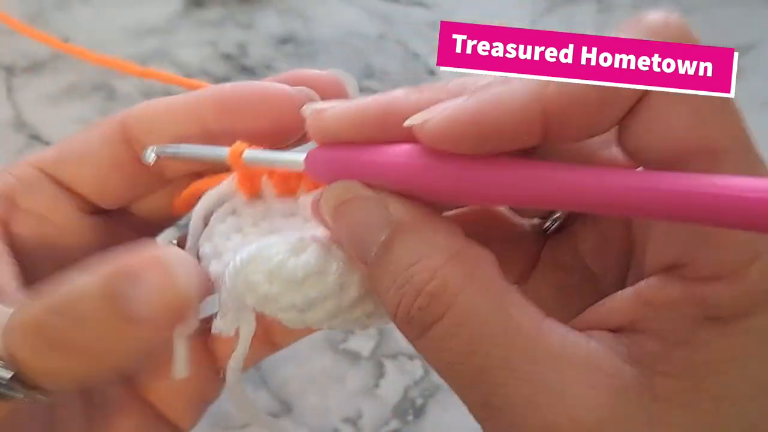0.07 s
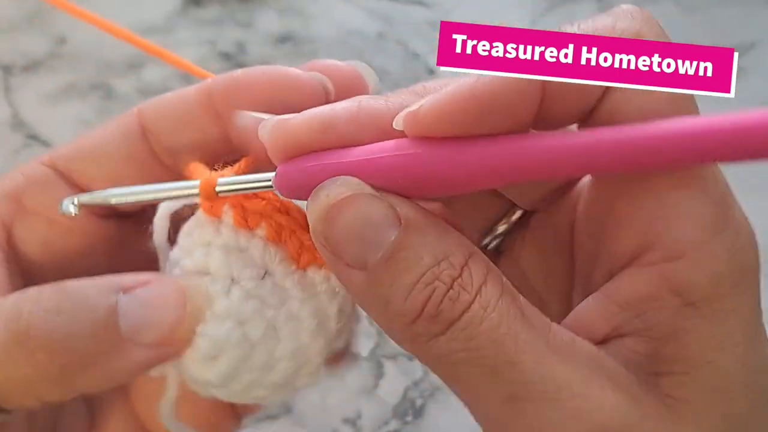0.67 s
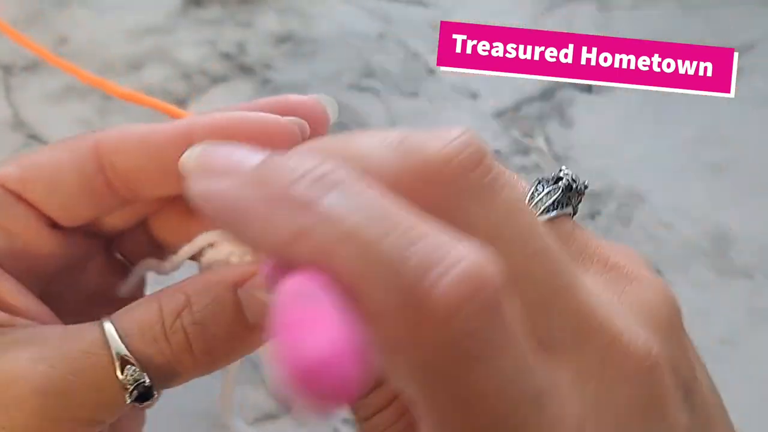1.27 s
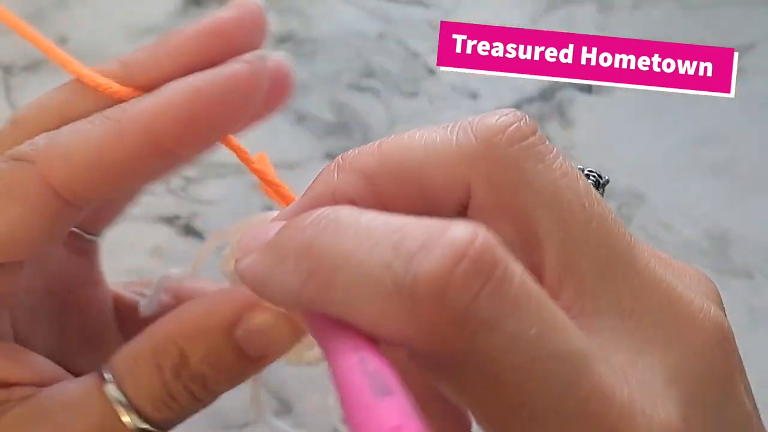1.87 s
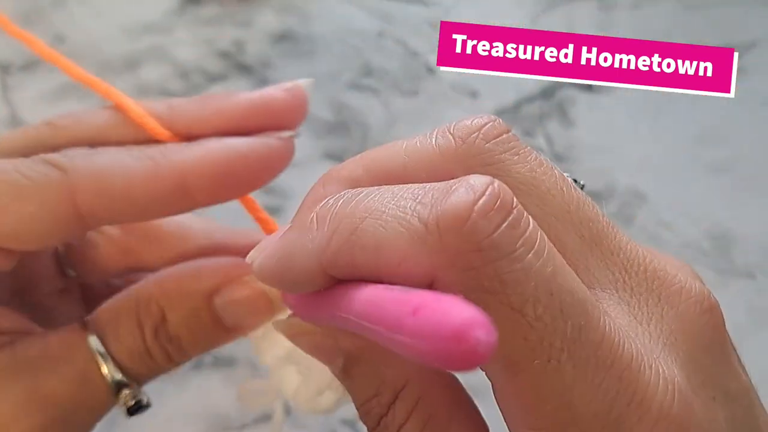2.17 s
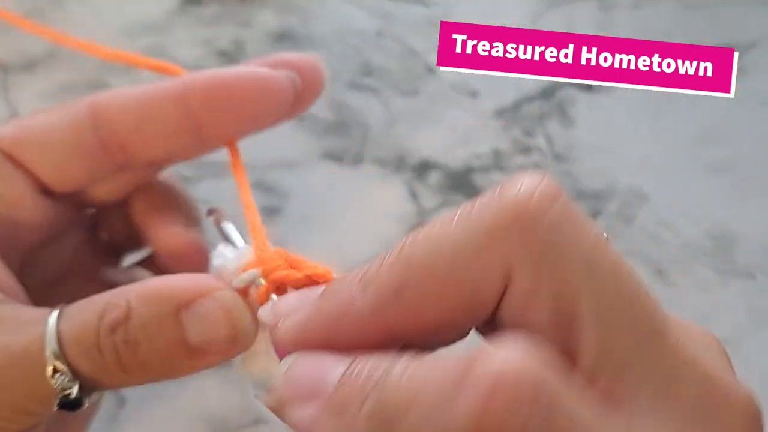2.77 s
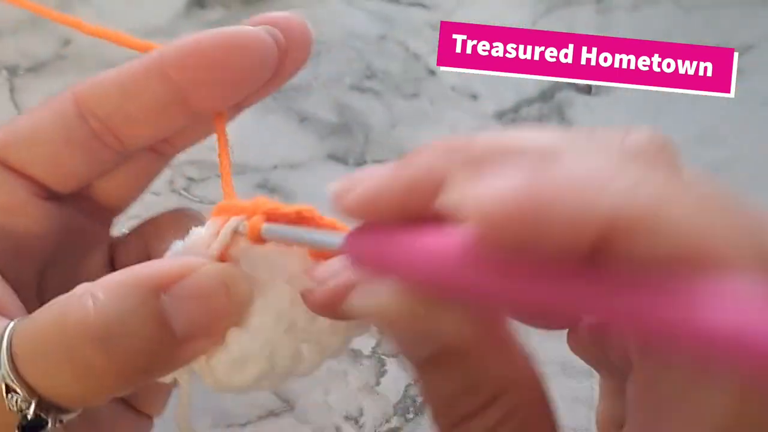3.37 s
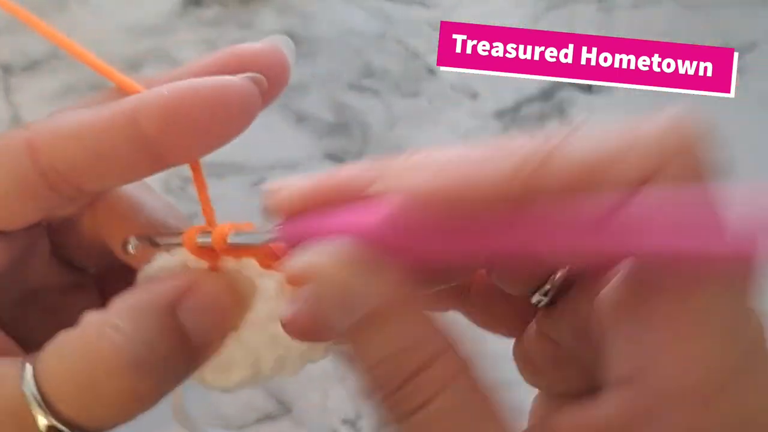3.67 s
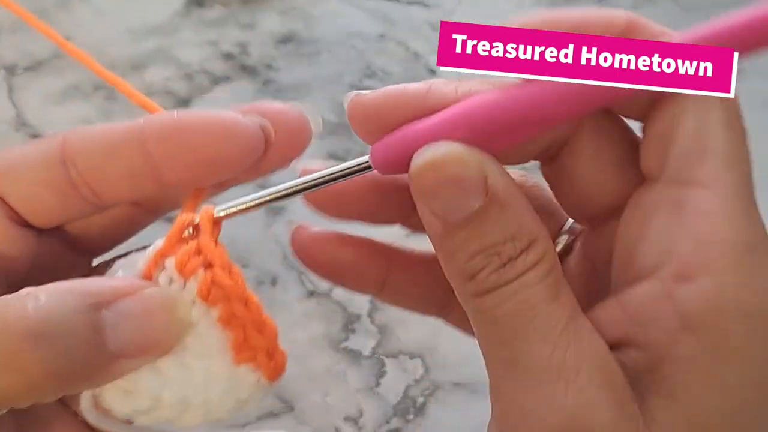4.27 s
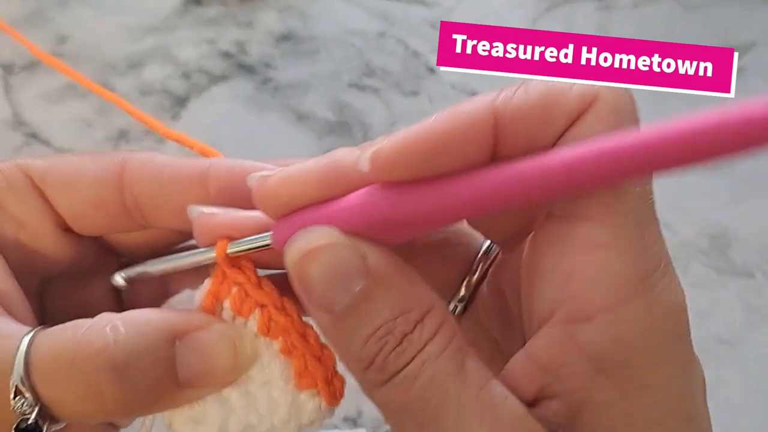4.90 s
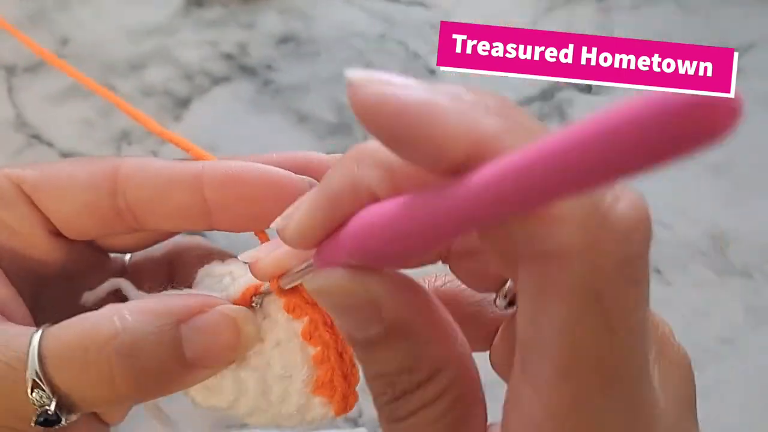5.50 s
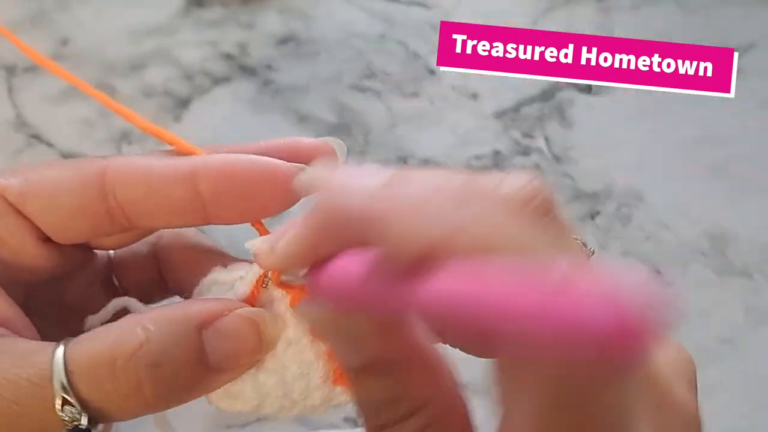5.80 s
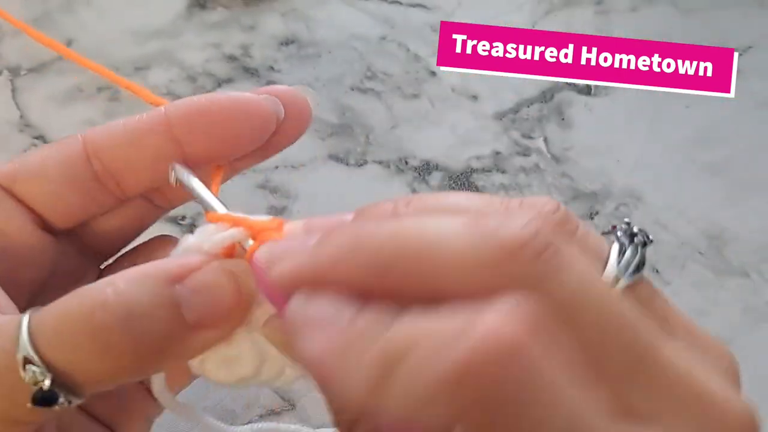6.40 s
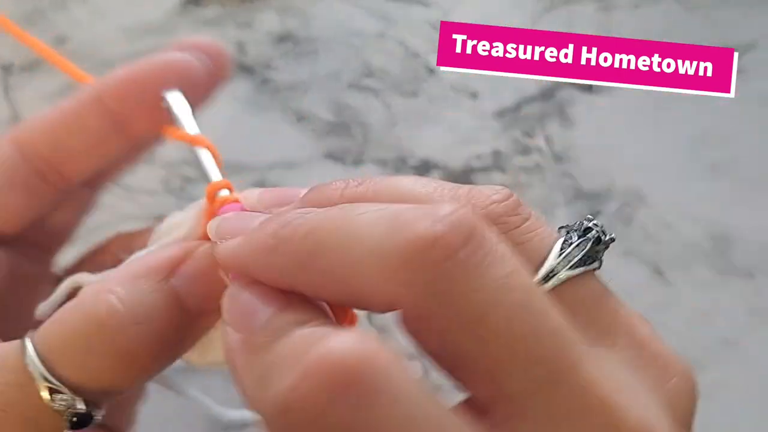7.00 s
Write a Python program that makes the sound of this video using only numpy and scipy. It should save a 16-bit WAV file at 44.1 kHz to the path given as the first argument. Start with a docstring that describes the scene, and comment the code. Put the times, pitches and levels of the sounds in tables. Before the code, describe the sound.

Yarn is crocheted with a metal hook close to the microphone in a quiet room. Soft, uneven rustles swell with each pull, mixed with faint squeaks of skin on the handle. A small click and bump come near the start. About halfway, one sharper knock rings briefly with a slight metallic rattle, followed by dull finger thuds. The rustling then continues, over a steady low appliance hum and light hiss.

```python
"""Yarn is crocheted with a metal hook over a table, close by in a quiet room. Sliding friction makes the sound:
fibres catch and release in a fizz, and skin sticks and slips. Nails and hook tick, the hands bump the work and
lean on the table, and one hard knock, the loose metal falling back just after it, and one later faint knock
excite the modes of a camera stand. An appliance hums steadily behind it all."""
import sys
import numpy as np
from scipy import signal
from scipy.fft import rfft, irfft
from scipy.io import wavfile

SR = 44100
rng = np.random.default_rng(int(sys.argv[2]) if len(sys.argv) > 2 else 0)


def int16_out(signal):
    """Quantize to a 16-bit WAV file."""
    q = np.round(np.clip(np.atleast_2d(signal).T, -1, 1) * 32767)
    wavfile.write(sys.argv[1], SR, q.astype(np.int16))


N = 319725
T = np.arange(N) / SR
HZ = np.fft.rfftfreq(N, 1 / SR)


def amp(db):
    """Amplitude ratio of a level in decibels."""
    return 10 ** (np.asarray(db) / 20)


def unit(x):
    """Normalisation to rms 1."""
    return x / np.sqrt(np.mean(x ** 2) + 1e-30)


def curve(points, hz, column=1):
    """Interpolation of a table column on a log-frequency axis."""
    table = np.array(points, float)
    return np.interp(np.log(hz + 1), np.log(table[:, 0] + 1), table[:, column])


def pan(balance_db):
    """Level difference, left over right, as two gains of mean power 1."""
    half_db = np.atleast_1d(balance_db) / 2
    gains = amp([half_db, -half_db])
    return gains / np.sqrt(np.mean(gains ** 2, 0))


def colour(x, gain):
    """Spectral shaping by a gain at each frequency, scaled to rms 1."""
    return unit(irfft(rfft(x) * gain, N))


def drift(rate_hz):
    """Random modulation: low-pass noise of rms 1."""
    return colour(rng.standard_normal(N), np.exp(-(HZ / rate_hz) ** 2) * (HZ > 0))


def ring(x, spectrum, tilt_db=0, peak_hz=1000, peak_db=0, peak_octaves=0.23):
    """Minimum-phase filtering with a tilt and one resonance: the ringing follows its cause."""
    hz = abs(np.fft.fftfreq(1024, 1 / SR))
    peak = peak_db * np.exp(-(np.log2((hz + 1) / peak_hz) / peak_octaves) ** 2)
    tilt = tilt_db * np.log2((hz + 300) / 5000)
    log_gain = np.log(amp(curve(spectrum, hz) + peak + tilt))
    taps = np.fft.ifft(np.exp(np.conj(signal.hilbert(log_gain)))).real
    return signal.fftconvolve(x, taps[None] / np.linalg.norm(taps), axes=1)


def add(mix, start, sound):
    """Superposition of a sound on the mix, from a start in seconds."""
    part = mix[:, max(round(start * SR), 0):][:, :sound.shape[1]]
    part += sound[:, :part.shape[1]]


def stroke_speed(t, middle, length):
    """A stroke's speed is half a cosine cycle, from rest to rest."""
    return np.cos(np.pi * np.clip((t - middle) / length, -.5, .5))


def swell(middle, length, hz, width_hz):
    """Band-limited friction noise with amplitude proportional to speed; returns start and sound."""
    t = T[abs(T - middle) < length / 2]
    f = np.fft.rfftfreq(len(t), 1 / SR)
    response = 1 / np.sqrt(1 + (2 * (f - hz) / width_hz) ** 4)
    band = irfft(rfft(rng.standard_normal((2, len(t)))) * response, len(t))
    return t[0], unit(band) * stroke_speed(t, middle, length)


# Spectra of room air and microphone hiss. Each row: frequency in Hz, relative level in dB.
AIR_SPECTRUM = [(20, -23), (38, 0.5), (56, -2), (85, -2), (145, -3), (175, 9.5), (205, -3.5), (242, 1.5),
                (285, -1.5), (450, -2.5), (570, -10), (720, -16.5), (1200, -30), (3200, -42.5)]
HISS_SPECTRUM = [(600, 0.5), (1700, 1.5), (3000, -1.5), (4300, -5), (5800, 1), (6550, 4), (7300, -2.5),
                 (10000, -3.5), (12400, 4.5), (14000, -5), (16000, 1)]
# The field at two microphone ports. Each row: frequency in Hz, left over right in dB, correlation.
PORT_FIELD = [(60, 7, 0.99), (236, 3, 0.5), (492, 5, 0.27), (940, -1.5, 0.18), (1900, -3.5, 0.25),
              (6000, 4, 0.35), (14900, 5, 0.081)]

def room_noise():
    """Partial coherence: low air noise is partly shared by the ports, while their hiss is independent."""
    left, independent = rng.standard_normal((2, N))
    coherence = np.clip(curve(PORT_FIELD, HZ, column=2), -1, 1)
    right = irfft(coherence * rfft(left) + np.sqrt(1 - coherence ** 2) * rfft(independent), N)
    balance = pan(curve(PORT_FIELD, HZ))
    air = colour(np.array([left, right]), amp(curve(AIR_SPECTRUM, HZ)) * balance)
    hiss = colour(rng.standard_normal((2, N)), amp(curve(HISS_SPECTRUM, HZ)) * balance)
    return amp(-53 + drift(7.4)) * air + amp(-62.5) * hiss


# Motor and mains partials. Each row: frequency in Hz, relative level in dB, left over right in dB.
HUM_PARTIALS = [(58.85, -60.5, 5), (103, -68, 7), (120, -62, 6), (176.5, -67, 2), (206, -69.5, 10),
                (232.9, -59.3, 6), (240, -59.8, 2), (294.3, -70, 0), (353.1, -60, 0), (470.8, -61.7, 3)]

def appliance_hum():
    """Beating: among slightly wavering partials, a close pair throbs seven times a second."""
    out = np.zeros((2, N))
    for hz, db, balance_db in HUM_PARTIALS:
        phase = 2 * np.pi * (hz * T + rng.random()) + .2 * drift(3)
        partial = unit(np.sin(phase) * amp(1.4 * drift(3)))
        out += amp(db) * pan(balance_db) * partial
    return amp(-0.43) * out


# Hands leaning on the table. Each row: middle in seconds, length in seconds,
# relative rumble level in dB, thrum over rumble in dB.
TABLE_PUSHES = [(0.368, .09, -48, -10), (.46, 0.078, -60, 13.5), (.68, .094, -48.5, -2),
                (1.168, 0.16, -51, -8), (1.225, .1, -61.5, 16), (3.059, .33, -48, -7.5),
                (4.075, .13, -43, -1.5), (6.031, 0.17, -63.5, 14.5), (6.19, .08, -62.5, 17)]

def table_pushes(rumble_hz=63, thrum_hz=198, relative_width=0.54):
    """Forced vibration: shifting hands drive two broad table resonances, much alike at both ports."""
    out = np.zeros((2, N))
    for middle, length, db, thrum_db in TABLE_PUSHES:
        for hz, level_db in (rumble_hz, db), (thrum_hz, db + thrum_db):
            start, sound = swell(middle, length, hz, relative_width * hz)
            fade = np.linspace(1, .5, sound.shape[1])
            add(out, start, amp(level_db) * fade * (sound + 0.54 * sound[::-1]))
    return out * pan(3.5)


# Fingers and knuckles meeting the work. Each row: start in seconds, level in dB, pitch in Hz,
# 60 dB decay time in seconds.
FINGER_BUMPS = [(.383, -31.5, 313, 0.018), (.584, -42, 520, 0.012), (2.905, -44, 258, .05),
                (3.28, -37, 368, 0.048), (3.942, -38.5, 390, 0.12), (3.951, -31, 99, 0.048),
                (3.978, -35, 318, 0.089), (4.056, -38, 95, 0.048), (5.931, -39, 316, 0.078),
                (6.304, -45, 407, 0.052), (7.185, -40.5, 265, 0.058)]

def finger_bumps(rise_s=0.0025, puff_db=-6.5, puff_octaves=0.9):
    """Damped impact: flesh cushions each thud and adds a dull puff of noise around its pitch."""
    out, t = np.zeros((2, N)), T[:SR // 8]
    f = np.fft.rfftfreq(len(t), 1 / SR)
    for start, db, hz, t60 in FINGER_BUMPS:
        band = np.exp(-(np.log2((f + 1) / hz) / puff_octaves) ** 2)
        puff = irfft(rfft(rng.standard_normal((2, len(t)))) * band, len(t))
        thud = np.sin(2 * np.pi * hz * t) + amp(puff_db) * unit(puff)
        envelope = (1 - np.exp(-(t / rise_s) ** 2)) * amp(-60 * t / t60)
        add(out, start, amp(db) * envelope / envelope.max() * thud)
    return out * pan(2.6)


def stand_sway():
    """Low-frequency rocking: the stand wobbles after the hard knock, partly in antiphase at the ports."""
    out = np.zeros((2, N))
    start, sound = swell(middle=3.92, length=.44, hz=72, width_hz=62)
    add(out, start, amp(-42.5) * (sound - 0.36 * sound[::-1]))
    return out * pan(2.3)


# Modes of the stand and table. Each row: frequency in Hz, relative level in dB,
# 60 dB decay time in seconds, left over right in dB, phase lead of the left side in radians.
STAND_MODES = [(65.6, -11, 1, 1.5, 3), (166, -10, 0.28, 4, 1.5), (237.8, -1.5, 0.17, 1, 2),
               (260, 2, 0.12, -2.5, 3), (329, -9.5, 0.21, -11, -3), (408, -2.5, 0.088, 1, 3),
               (470, -1, 0.032, -14, -3), (520, -3.5, 0.076, -21, 4), (572, -3.5, 0.05, -25, 3),
               (722, -11, 0.098, -3, -3), (776, -7, 0.044, -6, 4.5), (944, -7.5, 0.053, -10, 4),
               (1140, -7, 0.043, -13, -2.5), (1828, -16, 0.11, -4, 1), (2015, -6.5, 0.02, 1, 5),
               (2170, -10.5, .05, 4, 3)]
# Spectrum of loose metal. Each row: frequency in Hz, relative level in dB.
RATTLE_SPECTRUM = [(3000, -32), (3700, -12), (4600, -7), (5050, 3), (5400, 3), (5700, -8), (6650, -3),
                   (7100, -31), (16000, -44)]
# Blows on the stand and table: a hard knock, loose metal dropping back onto the stand, and a faint knock. Each
# row: start in seconds, relative level in dB, contact time in seconds.
STAND_BLOWS = [(3.7143, -22.5, 0.00031), (3.7538, -43, 0.00054), (4.221, -43, 0.002)]

def stand_knocks(hard_blow_db=-23, rattle_slope=1.3, rebound_s=0.035, room_t60=0.43):
    """Modal response: each blow rings the stand and shakes loose metal, which drops back once."""
    out, t = np.zeros((2, N)), T[:SR // 2]
    modes = np.zeros((2, len(t)))
    for hz, db, t60, balance_db, lead in STAND_MODES:
        phase = 2 * np.pi * hz * t + np.array([[lead], [0]])
        modes += amp(db - 60 * t / t60) * pan(balance_db) * np.sin(phase)
    modes *= 1 - np.exp(-t / 0.00082)
    chatter_decay = amp(-60 * t / 0.021) + amp(-12.5 - 60 * t / 0.2)
    for start, db, contact_s in STAND_BLOWS:
        force = t * np.exp(-4 * t / contact_s)  # a longer contact gives a duller blow
        body = signal.fftconvolve(modes, force[None] / force.sum(), axes=1)[:, :len(t)]
        room = rng.standard_normal((2, len(t))) * amp(-60 * t / room_t60) * (t > .008)
        reverb = signal.fftconvolve(body, room / np.linalg.norm(room[0]), axes=1)[:, :len(t)]
        add(out, start, amp(db) * (body + amp(-8) * reverb))
        chatter = rng.standard_normal((2, len(t))) * chatter_decay
        rattle_db = -34 + rattle_slope * (db - hard_blow_db)  # falls off steeply under weaker blows
        rattle = amp(rattle_db) * pan(12) * ring(chatter, RATTLE_SPECTRUM)
        add(out, start, rattle)
        add(out, start + rebound_s, amp(-10.5) * rattle)
    return out


# Spectrum of a tick. Each row: frequency in Hz, relative level in dB.
TICK_SPECTRUM = [(200, -5.5), (900, 1), (1350, -7.5), (2200, 2), (3200, -10), (4300, 2), (7500, 1),
                 (10000, 0.5), (13000, 3), (16000, 1)]
# Nail and hook contacts. Each row: snap time in seconds, relative level in dB, 60 dB decay time in
# seconds, tilt in dB per octave, contact resonance in Hz, its height in dB.
HOOK_TICKS = [(0.3826, -27.5, 0.0058, -0.7, 6800, 1), (0.5849, -38, .009, -2, 8000, 2),
              (2.494, -51.5, .014, 0, 8500, 10), (4.222, -42, 0.014, 0, 13500, 8),
              (4.486, -45, 0.092, 0.5, 4940, 6.5), (6.1982, -49, .009, -2, 7500, 6)]

def hook_ticks(snap_db=11, slip_share=0.043, room_t60=0.17):
    """Sudden release: a nail or the hook starts to slip, snaps off and leaves a faint room tail."""
    out = np.zeros((2, N))
    t = T[:SR // 5] - 0.02  # zero at the snap
    after = np.maximum(t, 0)
    snap = amp(snap_db) * (t == 0)
    for snap_time, db, t60, tilt_db, peak_hz, peak_db in HOOK_TICKS:
        slip = np.exp(np.minimum(t, 0) / (slip_share * t60))
        decay = amp(-60 * after / t60) + amp(-16 - 60 * after / room_t60)
        drive = slip * decay * rng.standard_normal((2, len(t))) - snap
        add(out, snap_time + t[0], amp(db) * ring(drive, TICK_SPECTRUM, tilt_db, peak_hz, peak_db))
    return out * pan(6.2)


def stick_slip(middle, length, hz, width_hz, slips_per_s=650, hiss=0.73, bend=0.034):
    """Stick-slip jerks ring a resonance whose pitch rises with speed; returns start and sound."""
    t = T[abs(T - middle) < length / 2]
    speed = stroke_speed(t, middle, length)
    slips = (rng.random(len(t)) < slips_per_s / SR) * rng.choice([-1., 1.], (2, len(t)))
    drive = unit(slips) + hiss * rng.standard_normal((2, len(t)))
    pitch_hz = hz * (1 + bend * (speed - speed.mean()))
    carrier = np.exp(2j * np.pi * np.cumsum(pitch_hz) / SR)
    # Shifting down, low-passing and shifting back makes a band that follows the pitch.
    band = carrier * signal.lfilter(*signal.butter(2, width_hz / SR), drive / carrier)
    return t[0], unit(band.real) * speed


# A finger sliding on the hook's handle. Each row: middle in seconds, length in seconds,
# relative level in dB, squeak pitch in Hz, bandwidth in Hz.
HANDLE_RUBS = [(1.542, 0.34, -67.5, 3970, 300), (1.8, 0.085, -65, 3720, 450), (3.65, 0.18, -65, 4650, 700),
               (4.054, .16, -67, 3900, 600), (5.171, 0.38, -68.5, 4640, 700),
               (5.56, 0.19, -71.5, 4150, 550), (5.805, 0.072, -68.5, 4570, 700),
               (6.386, 0.15, -69, 4000, 350), (6.655, 0.098, -60.5, 4320, 650),
               (6.796, 0.1, -59, 4550, 950), (7.184, .26, -60.5, 4970, 900)]
# Dry skin dragging. Each row: middle in seconds, length in seconds, resonance of the hand's hollow
# in Hz, relative level in dB.
SKIN_DRAGS = [(0.058, 0.79, 1580, -68), (0.048, 0.47, 2900, -65.5), (1.452, .17, 2650, -70.5),
              (1.565, 0.057, 1560, -67.5), (2.6, 0.57, 1100, -71), (4.846, 0.13, 2620, -69.5),
              (5.15, .48, 1140, -72.5), (6.665, 0.071, 2700, -76), (6.798, 0.089, 2547, -64),
              (7.05, .1, 2730, -68)]

def skin_squeaks():
    """Stick-slip friction: skin squeaks on the handle, and its drags ring the hollow of the hand."""
    out = np.zeros((2, N))
    for middle, length, db, hz, width_hz in HANDLE_RUBS:
        start, sound = stick_slip(middle, length, hz, width_hz)
        add(out, start, amp(db - 0.5) * sound)
    for middle, length, hz, db in SKIN_DRAGS:
        start, sound = stick_slip(middle, length, hz, width_hz=480)
        add(out, start, amp(db) * sound)
    return out * amp(2 * drift(74)) * pan(5.5)


def yarn_feed():
    """Sliding friction: fresh yarn from the ball rasps over the raised finger."""
    out = np.zeros((2, N))
    add(out, *swell(middle=1.53, length=.3, hz=7100, width_hz=3800))
    return amp(-59 + 1.9 * drift(74)) * out * pan(3.4)


def fibre_noise(spectrum, snaps_per_s, spread_db, flutter_db):
    """Shot noise: fibres catch and let go in tiny snaps over a smooth hiss of equal power."""
    catches = rng.random(N) < snaps_per_s / SR
    strength = amp(spread_db * np.minimum(rng.exponential(1, N), 4))
    snaps = unit(catches * strength * rng.standard_normal((2, N)))
    drive = snaps + rng.standard_normal((2, N))
    flutter = amp(flutter_db * drift(42))
    return colour(drive * flutter, amp(curve(spectrum, HZ)))


def palm_reflection(x, delay_s=.00078, gain=.4, wander=.08):
    """Comb filtering: the moving hand returns a close echo, so hollow resonances slide."""
    delayed_time = T - delay_s * (1 + wander * drift(3.8))
    echo = np.array([np.interp(delayed_time, T, port) for port in x])
    return unit(x + gain * echo)


def stroke_power(strokes):
    """Incoherent addition: the powers of strokes sum, each following the square of its speed."""
    power = np.zeros(N)
    for middle, length, db, *_ in strokes:
        moving = abs(T - middle) < length / 2
        power[moving] += (amp(db) * stroke_speed(T[moving], middle, length)) ** 2
    return power


# Spectra of sliding yarn and rubbing fingers. Each row: frequency in Hz, relative level in dB.
YARN_SPECTRUM = [(900, -16), (3200, -9.5), (4600, -9.5), (5800, -3.5), (8200, 1.5), (9600, -2.5),
                 (12200, 2), (14000, -1.5), (16000, -6.5)]
FINGER_SPECTRUM = [(500, -14), (1400, -14), (2150, -13.5), (2600, -10), (3200, -19.5), (4000, -5),
                   (5000, -0.5), (6100, -5.5), (8000, -23), (10000, -12), (16000, -28)]
# The work shifting in the hands. Each row: time in seconds, relative levels of yarn and fingers in dB.
SHUFFLE_LEVELS = [(0, -69, -78), (.6, -65.5, -69.5), (1.05, -66, -79), (1.35, -68.5, -79), (2.2, -74, -88),
                  (3.1, -74, -89), (3.45, -73, -79), (3.8, -58.5, -57.5), (4.15, -67, -65),
                  (4.6, -67.5, -78.5), (5.3, -70, -76), (6.0, -78, -81), (6.45, -67, -74), (7.25, -66, -74)]
# Yarn drawn over the hook. Each row: middle in seconds, length in seconds,
# relative levels of yarn and fingers in dB.
YARN_PULLS = [(0.058, 0.054, -52.5, -70), (0.37, 0.19, -62, -62.5), (0.53, .1, -63, -65),
              (0.864, 0.76, -65.5, -72), (1.777, .1, -59.5, -67), (2.378, 0.14, -65, -68),
              (2.617, 0.079, -57.5, -71), (2.726, 0.1, -62, -68), (2.88, .093, -60.5, -69),
              (3.313, .17, -64.5, -68), (3.514, 0.16, -56, -59.5), (4.211, 0.12, -57, -64.5),
              (4.367, .11, -58, -63.5), (4.84, 0.15, -61.5, -65.5), (5.121, 0.091, -56, -62.5),
              (6.37, 0.44, -61, -64.5), (6.497, 0.065, -57, -65), (6.653, 0.13, -58, -65),
              (6.815, 0.21, -61, -61), (7.049, 0.16, -55.5, -57.5)]

def crochet_friction(uneven_db=3, uneven_hz=9.7):
    """Friction noise: yarn and fingers shuffle unevenly and swell with every pull and rub."""
    times, yarn_db, finger_db = np.transpose(SHUFFLE_LEVELS)
    waver_db = uneven_db * drift(uneven_hz)
    yarn_shuffle = amp(np.interp(T, times, yarn_db) + waver_db)
    finger_shuffle = amp(np.interp(T, times, finger_db) + waver_db)
    rub_power = stroke_power(HANDLE_RUBS)
    carried_power = rub_power * amp(-4) ** 2  # each rub carries some yarn along
    finger_pulls = [(middle, length, db) for middle, length, _, db in YARN_PULLS]
    yarn_envelope = np.sqrt(yarn_shuffle ** 2 + stroke_power(YARN_PULLS) + carried_power)
    finger_envelope = np.sqrt(finger_shuffle ** 2 + stroke_power(finger_pulls) + rub_power)
    yarn = fibre_noise(YARN_SPECTRUM, snaps_per_s=3000, spread_db=-0.5, flutter_db=1.5)
    fingers = fibre_noise(FINGER_SPECTRUM, snaps_per_s=900, spread_db=0, flutter_db=1.2)
    fingers = palm_reflection(fingers)
    return amp(3) * yarn * yarn_envelope * pan(3.1) + amp(0.9) * fingers * finger_envelope * pan(5.8)


def scene():
    """Superposition of all sources at the two ports."""
    handwork = crochet_friction() + skin_squeaks() + yarn_feed() + hook_ticks()
    thuds = stand_knocks() + stand_sway() + table_pushes() + finger_bumps()
    return handwork + thuds + appliance_hum() + room_noise()


def record(dry):
    """Band limiting: a linear-phase low-pass filter removes the highest treble."""
    lowpass = signal.firwin(601, cutoff=15830, window=("kaiser", 8), fs=SR)
    return signal.oaconvolve(dry, lowpass[None], "same", axes=1)


dry = scene()
out = record(dry)
int16_out(out)
```